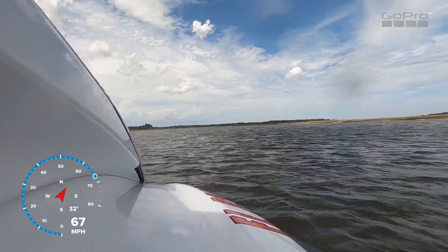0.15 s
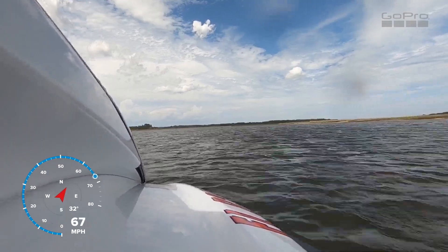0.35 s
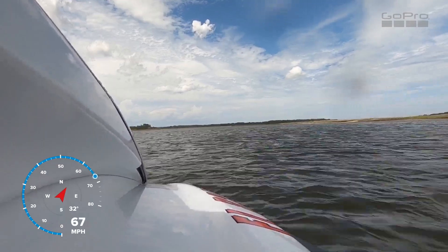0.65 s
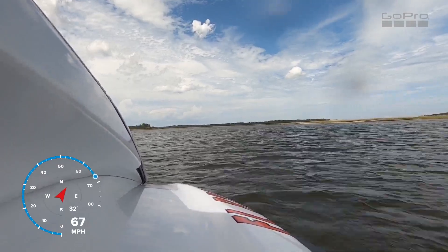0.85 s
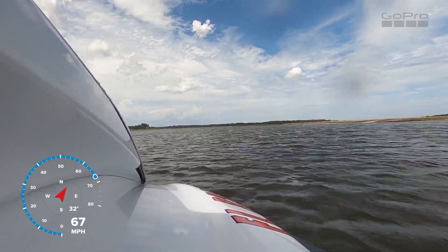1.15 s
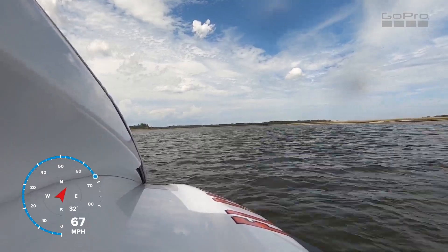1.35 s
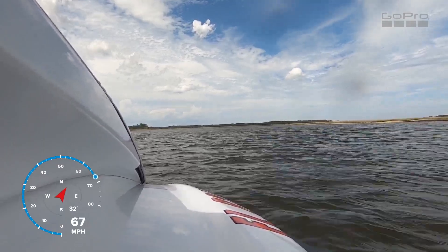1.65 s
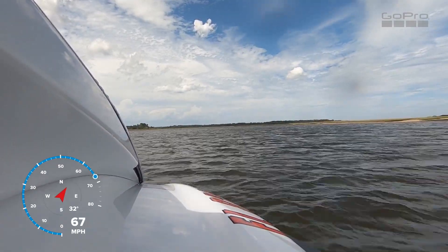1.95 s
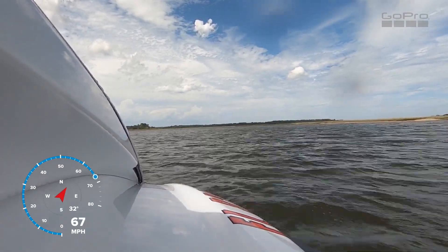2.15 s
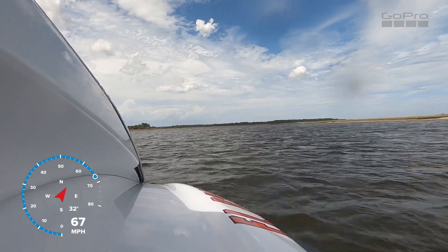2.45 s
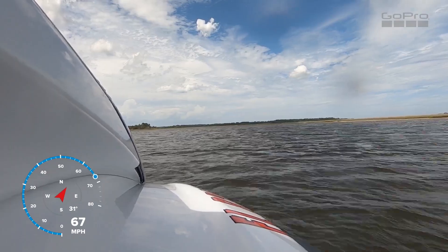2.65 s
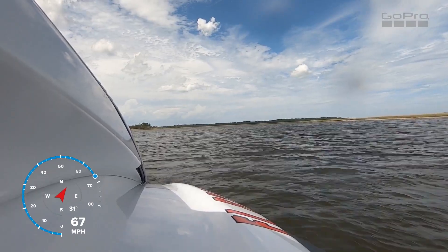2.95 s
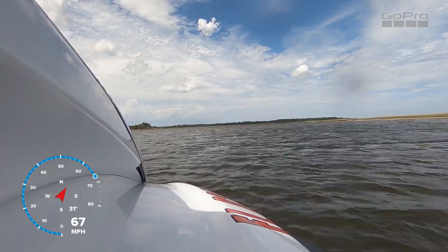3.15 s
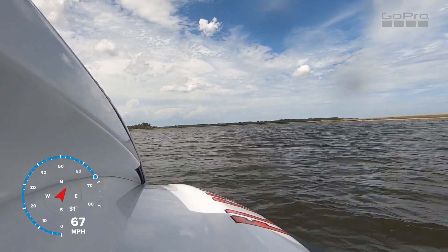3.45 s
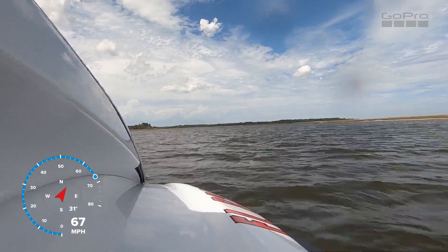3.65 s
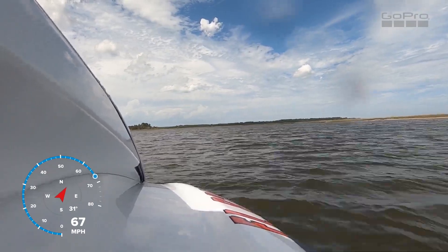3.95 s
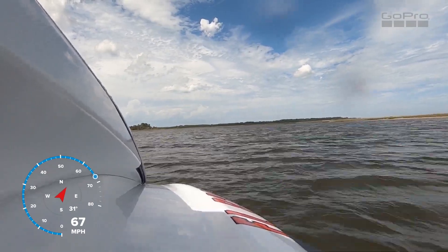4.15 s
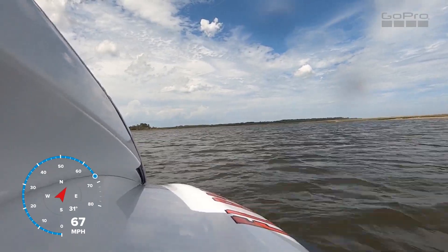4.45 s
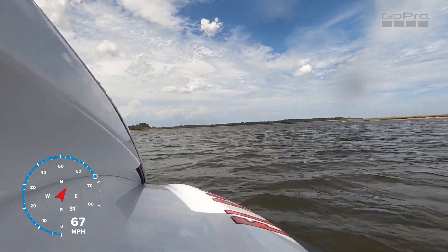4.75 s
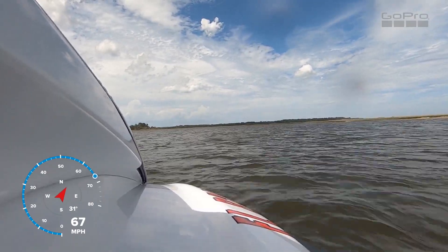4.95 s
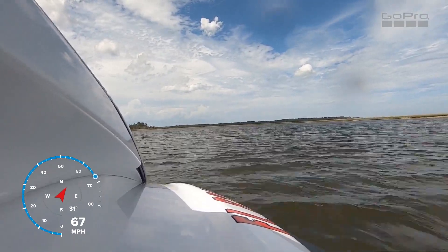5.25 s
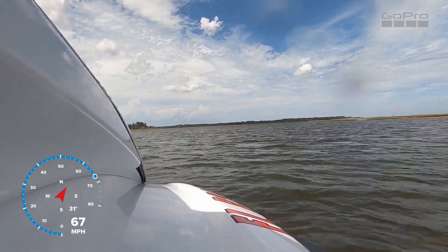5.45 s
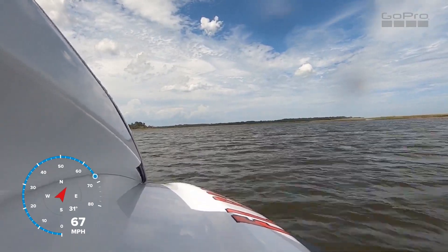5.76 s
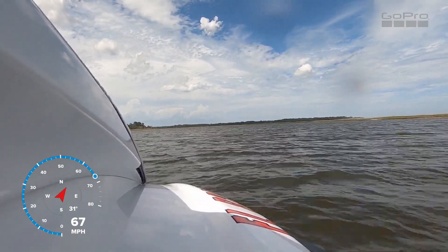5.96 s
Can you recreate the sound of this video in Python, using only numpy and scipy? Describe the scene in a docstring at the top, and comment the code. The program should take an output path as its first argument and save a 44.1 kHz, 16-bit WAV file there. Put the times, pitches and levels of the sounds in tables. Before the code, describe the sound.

A small powerboat runs flat out over choppy open water. A deep, steady engine drone with a faint higher singing tone booms through the hull, fluttering with brief dropouts. Dull thuds, panel rattle and quiet spray churn continuously, while irregular wave slaps jump out. The hull-mounted microphone sounds close, mono and muffled, with peaks squeezed.

```python
"""The engine of a small jet boat sings in steady tones through the hull as it planes over choppy water.
Sine orders follow the crankshaft; a wandering sine near shaft speed is the booming deck.
Noise coloured by the shell makes thuds, rattle, spray, slaps and rocking; brief noise ticks are drops.
A camera fixed to the hull hears it: its sealed housing dulls the treble, its recorder squeezes peaks."""
import sys
import numpy as np
from scipy import signal
from scipy.fft import rfft, irfft, next_fast_len
from scipy.io import wavfile
from scipy.ndimage import uniform_filter1d, minimum_filter1d, map_coordinates

SR = 44100
rng = np.random.default_rng(int(sys.argv[2]) if len(sys.argv) > 2 else 0)


def unload_audio(sound):
    """Save the sound as a 16-bit wav file, at the path given as the first command line argument."""
    columns = np.transpose(np.atleast_2d(sound))
    # keep every value between -1 and 1, then stretch to whole-number steps
    steps = np.round(np.clip(columns, -1, 1) * 32767)
    wavfile.write(sys.argv[1], SR, steps.astype(np.int16))


N = 269451

# panel rattle spectrum: (frequency [Hz], relative density [dB])
RATTLE_SPECTRUM = [(250, -40), (350, -3.5), (500, 1.5), (1000, -2.5), (1400, -2), (1700, -7), (1850, -29),
                   (2300, -49.5)]
# spray spectrum: (frequency [Hz], relative density [dB])
SPRAY_SPECTRUM = [(1500, -28.5), (1850, -1), (2900, -11), (3500, -4.5), (4700, -8), (5300, -25.5),
                  (6800, -35.5), (8700, -39), (9100, -44.5), (12500, -42.5), (14200, -58)]


def amp(db):
    """Convert dB to gain."""
    return 10 ** (np.asarray(db) / 20)


def unit(x):
    """Scale to rms 1."""
    return x / np.sqrt(np.mean(x ** 2) + 1e-20)


def curves(rows):
    """Interpolate each column after the time to one value per sample."""
    time_s, *columns = np.transpose(rows)
    return [np.interp(np.arange(N) / SR, time_s, column) for column in columns]


def wobble(rate_hz):
    """Smooth random curve with rate_hz knots a second."""
    knots = rng.standard_normal(int(N * rate_hz / SR) + 4)
    return map_coordinates(knots, [np.arange(N) * rate_hz / SR])


def filtered(x, response):
    """Multiply the spectrum of x by a real response(hz), so without phase shift."""
    size = next_fast_len(N + SR // 2)
    hz = np.fft.rfftfreq(size, 1 / SR)
    return irfft(rfft(x, size) * response(hz), size)[..., :N]


def through_shell(x, spectrum):
    """Colour x by a spectrum and the shell's resonances; white x of rms 1 leaves at rms 1."""
    # resonances (+) and dead spots (-) of hull, mount and housing: (centre [Hz], width [Hz], lift [dB])
    resonances = [(34.6, 8.2, 9.5), (91.7, 13, 3.5), (231, 7.8, -1.5), (350, 18, -1), (475, 53, 3.5),
                  (547, 52, 3), (593, 11, -3), (600, 30, 0.5), (668.5, 39, -4.5), (740, 66, 6.5),
                  (836, 66, -8.5), (892, 11, -10.5), (943, 60, 3.5), (1134, 58, -2.5), (1476, 160, -4.5),
                  (1580, 77, 2.5), (1643, 13, -6.5), (2035, 140, 5), (3330, 27, -5.5), (3433, 240, 9),
                  (3710, 100, -10), (4010, 150, 5), (4226, 44, -5.5), (4255, 110, 7), (4590, 100, -7.5),
                  (4640, 100, 3), (6350, 210, 10), (7840, 800, 8), (10400, 500, -5)]
    spectrum_hz, spectrum_db = np.transpose(spectrum)

    def response(hz):
        bumps_db = sum(lift_db / (1 + (2 * (hz - centre_hz) / width_hz) ** 2)
                       for centre_hz, width_hz, lift_db in resonances)
        base_db = np.interp(np.log(hz + 1), np.log(spectrum_hz + 1), spectrum_db, left=-120, right=-120)
        return unit(amp(base_db + bumps_db))
    return filtered(x, response)


def patchy(depth_db):
    """White noise whose strength drifts in patches of time and frequency."""
    z = signal.stft(rng.standard_normal(N + 512), nperseg=512)[2]
    field = uniform_filter1d(rng.standard_normal(z.shape), size=5, axis=0)
    field = uniform_filter1d(field, size=8, axis=1)
    noise = signal.istft(z * amp(depth_db * unit(field)), nperseg=512)[1]
    return unit(noise[:N])


def engine():
    """Crankshaft orders, each wavering with the load; half orders as a cylinder fires every second turn."""
    # crankshaft speed: (time [s], speed [turns/s])
    shaft = [(0.0, 122.75), (0.9, 123.05), (1.5, 122.86), (2.3, 122.15), (3.0, 122.66), (3.6, 122.35),
             (4.1, 122.87), (5.3, 123.03), (6.11, 122.8)]
    # steady tones: (multiple of shaft speed, mean level [dB])
    orders = [(1, -36), (2, -33), (3, -54), (3.5, -53), (6, -52.5), (8, -55), (9, -58.5), (11.5, -57.5),
              (13.5, -53), (14.5, -68), (16, -67), (16.5, -69)]
    # singing orders, swelling and fading as the load shifts:
    # (time [s], order 4 level [dB], order 4.5 level [dB])
    singing = [(0.0, -40, -40), (0.5, -40, -41.5), (1.0, -42.5, -38.5), (1.45, -40, -42.5),
               (1.7, -39.5, -52.5), (2.2, -38, -46.5), (2.7, -37.5, -46.5), (3.0, -43, -45),
               (3.7, -41.5, -42.5), (4.1, -43.5, -44), (4.7, -41.5, -47.5), (5.3, -44.5, -45),
               (5.7, -42, -41), (6.11, -43.5, -44.5)]
    load_db = 1.1
    shaft_rad = 2 * np.pi * np.cumsum(curves(shaft)[0]) / SR
    mix = np.zeros(N)
    for order, level_db in [*orders, *zip((4, 4.5), curves(singing))]:
        size = np.sqrt(2) * amp(level_db + load_db * wobble(3))
        start_rad = rng.uniform(0, 2 * np.pi)
        mix += size * np.sin(order * shaft_rad + start_rad + 0.22 * wobble(9.8))
    return mix


def deck():
    """The deck's lowest mode booms near shaft speed; pitch and strength wander, with brief dropouts."""
    # boom: (time [s], pitch [Hz], level before dips [dB])
    boom = [(0.0, 123.5, -20), (0.45, 122, -22.5), (0.85, 120.5, -20.5), (1.0, 129.3, -20.5),
            (1.4, 123, -21), (1.75, 122, -22), (2.05, 121.5, -20), (2.3, 126.4, -27), (2.5, 124.5, -17.5),
            (2.95, 122, -23.5), (3.2, 128.5, -22.5), (3.6, 122, -20.5), (4.05, 128.6, -22.5),
            (4.5, 124.6, -19), (4.85, 128.7, -21.5), (5.2, 120.2, -22), (5.45, 126.7, -17.5),
            (5.7, 120.6, -21.5), (6.11, 125, -21.5)]
    wander_hz, surge_db, flutter_db = 1.5, 1.2, 0.9
    pitch_hz, level_db = curves(boom)
    size = amp(level_db - bass_dips_db() + surge_db * wobble(9) + flutter_db * wobble(28))
    phase_rad = 2 * np.pi * np.cumsum(pitch_hz + wander_hz * wobble(12)) / SR
    return np.sqrt(2) * size * np.sin(phase_rad + 0.46 * wobble(25))


def bass_dips_db():
    # dropouts: (time [s], depth [dB])
    dropouts = [(0.24, 16), (0.57, 19), (1.1, 12), (1.38, 10.5), (1.46, 14), (1.64, 15), (2.1, 23),
                (2.331, 9.5), (2.59, 8.5), (2.99, 13), (3.2, 8), (3.46, 7.5), (3.78, 16), (4.0, 22),
                (4.15, 13), (4.36, 14), (4.53, 5), (4.78, 12), (5.37, 16.5), (5.54, 9), (5.89, 16),
                (6.0, 16.5)]
    sigma_s = 0.012
    t = np.arange(N) / SR
    return sum(depth_db * np.exp(-((t - at_s) / sigma_s) ** 2 / 2) for at_s, depth_db in dropouts)


def water():
    """Chop hammers the bottom: thuds, rattle and spray share part of the jolts; thuds lag the rest."""
    # chop strength: (time [s], rattle level [dB], spray level [dB])
    chop = [(0.0, -33.5, -49), (0.4, -33, -49.5), (0.85, -33, -48), (1.6, -34.5, -52), (2.3, -34, -49.5),
            (2.75, -32, -49.5), (3.1, -33, -50), (3.8, -34.5, -50.5), (4.3, -33.5, -48.5),
            (4.75, -35.5, -51), (5.15, -33.5, -48.5), (5.7, -34, -51), (6.11, -34.5, -47.5)]
    # thud spectrum: (frequency [Hz], relative density [dB])
    thud_spectrum = [(30, -46), (45, -15.5), (60, -13), (80, -15), (100, -3.5), (140, 0), (175, -3),
                     (205, -9.5), (300, -16), (350, -27), (450, -60)]
    thud_over_rattle_db = 12.5
    thud_follows, thud_dip_share = 0.83, 0.13  # dB per dB of rattle change; per dB of bass dip
    jolt_lag = 800  # samples
    rattle_db, spray_db = curves(chop)
    mean_db = rattle_db.mean()
    thud_db = mean_db + thud_over_rattle_db + thud_follows * (rattle_db - mean_db)
    thud_db = thud_db - thud_dip_share * bass_dips_db()
    jolt = wobble(14)

    thud_gain = amp(thud_db + 0.27 * np.roll(jolt, jolt_lag) + 0.63 * wobble(9))
    rattle_gain = amp(rattle_db + 0.27 * jolt + 0.8 * wobble(120))
    spray_gain = amp(spray_db + 0.25 * jolt + 0.96 * wobble(150))
    thud = through_shell(thud_gain * patchy(depth_db=0.1), thud_spectrum)
    rattle = through_shell(rattle_gain * patchy(depth_db=0.26), RATTLE_SPECTRUM)
    spray = through_shell(spray_gain * patchy(depth_db=0.63), SPRAY_SPECTRUM)
    return thud + rattle + spray


def slaps():
    """Crests meet the hull: noise bursts that swell in milliseconds and are gone in a few tens."""
    # slaps: (time [s], burst level before colouring [dB])
    crests = [(0.078, -35), (0.309, -29), (0.537, -30), (0.69, -33), (0.846, -30), (0.911, -32.5),
              (1.428, -27), (1.823, -34.5), (2.031, -35.5), (2.459, -33.5), (2.849, -32), (2.919, -34.5),
              (3.279, -29), (3.5, -35), (4.171, -35), (5.099, -30.5), (5.408, -24.5), (5.483, -31),
              (5.593, -32.5)]
    rise_s, splash_db = 0.0056, -22  # splash: treble relative to body
    u = np.arange(SR // 8) / SR / rise_s
    burst = u * np.exp(1 - u)
    gate = np.zeros(N + SR)
    for at_s, level_db in crests:
        gate[round(at_s * SR):][:len(u)] += amp(level_db) * burst
    body, splash = gate[:N] * rng.standard_normal((2, N))
    treble = through_shell(splash, SPRAY_SPECTRUM[:4])
    return through_shell(body, RATTLE_SPECTRUM) + amp(splash_db) * treble


def sway():
    """Lowest rumble: the mount rocks on the waves, as low noise coloured by the shell."""
    # rocking strength: (time [s], level [dB])
    rocking = [(0.0, -39), (0.25, -35), (0.95, -34), (1.15, -38), (2.3, -34), (2.55, -38), (3.2, -33),
               (4.2, -39.5), (5.0, -36), (6.11, -38)]
    # rocking spectrum: (frequency [Hz], relative density [dB])
    rocking_spectrum = [(12, -31), (22, -6), (34, -3), (48, -7), (65, -29)]
    return through_shell(amp(curves(rocking)[0]) * rng.standard_normal(N), rocking_spectrum)


def drops():
    """Single spray drops tick on the housing: noise falling 60 dB in 20 ms, banded near 7-9 kHz."""
    # ticks: (time [s], onset level before the filter [dB])
    ticks = [(0.6997, -58), (1.434, -69), (1.9092, -70), (2.83, -73), (3.2795, -75), (5.0694, -66.5)]
    t = np.arange(SR // 50) / SR
    gate = np.zeros(N + SR)
    for at_s, level_db in ticks:
        gate[round(at_s * SR):][:len(t)] += amp(level_db - 60 * t / 0.02)

    def band(hz):
        return 3 / (1 + (7200 / (hz + 1)) ** 12) / (1 + (hz / 9000) ** 6)
    return filtered(gate[:N] * rng.standard_normal(N), band)


def scene():
    """Sum all sources at the one microphone on the hull."""
    return (engine() + deck() + water() + slaps() + sway() + drops())[None]


def limit(x, top_db, share):
    """Look-ahead gain that takes a share of the dB over the top off each peak."""
    need = np.minimum(1, (amp(top_db) / (np.abs(x) + 1e-9)) ** share)
    held = minimum_filter1d(need, size=900, axis=1)
    return uniform_filter1d(held, size=700, axis=1)


def record(dry):
    """Limit the bass, then the whole; low-pass at the band limit."""
    top_hz = 14250
    bass = filtered(dry, lambda hz: 1 / (1 + (hz / 330) ** 4))
    tamed = dry - bass * (1 - limit(bass, top_db=-13.5, share=0.65))
    squeezed = tamed * limit(tamed, top_db=-10.0, share=0.8)
    edge = signal.ellip(12, 0.1, 60, top_hz, fs=SR, output="sos")
    return signal.sosfiltfilt(edge, squeezed)


dry = scene()
out = record(dry)
unload_audio(out)
```